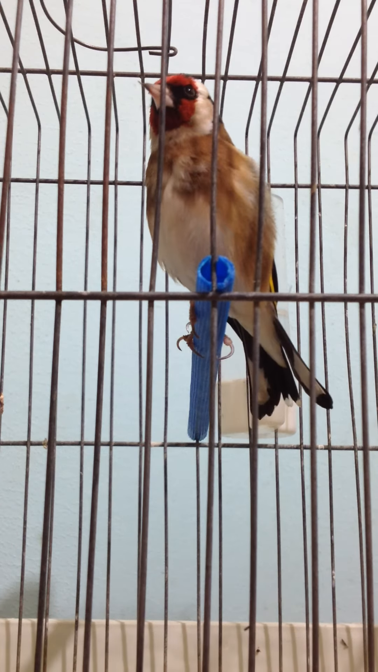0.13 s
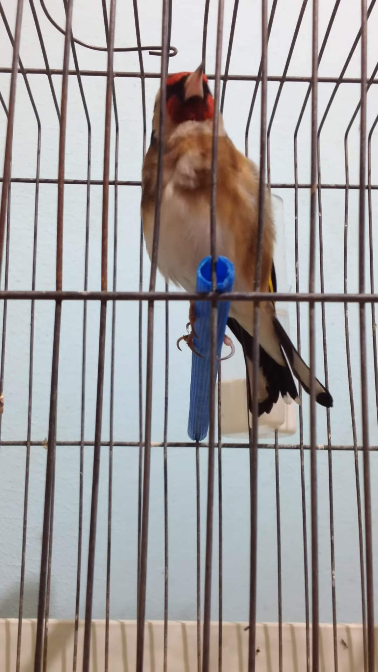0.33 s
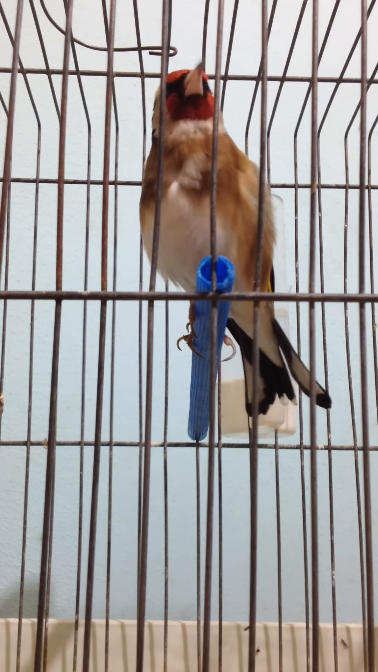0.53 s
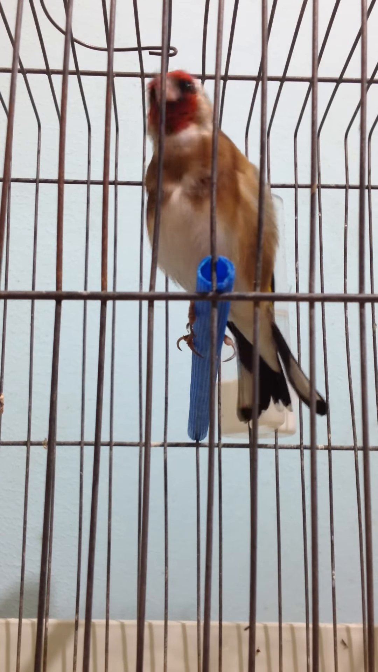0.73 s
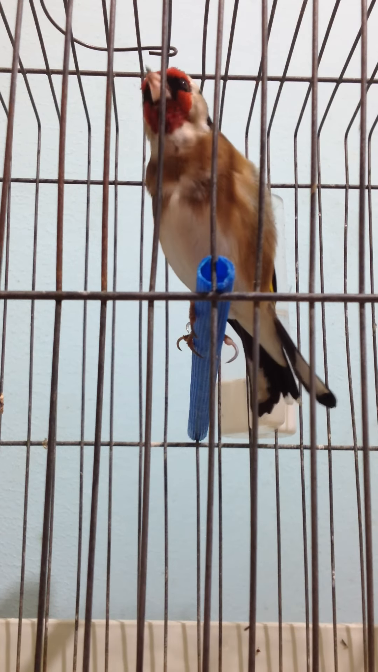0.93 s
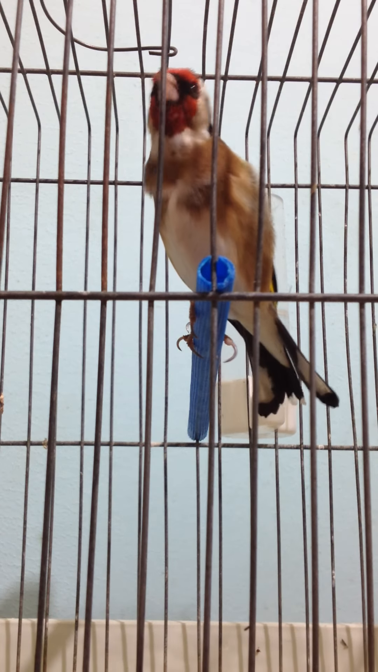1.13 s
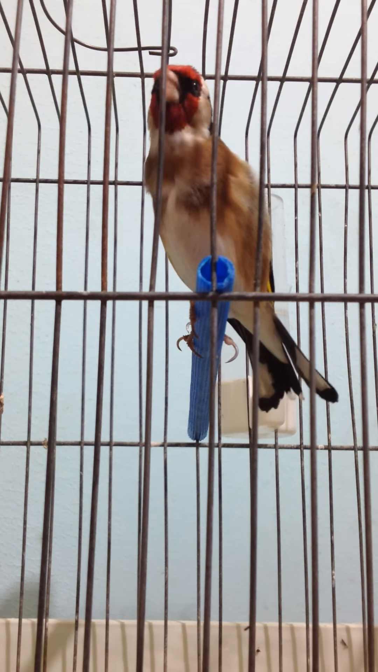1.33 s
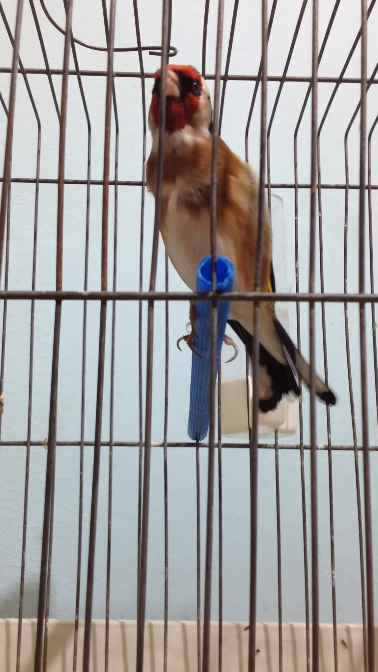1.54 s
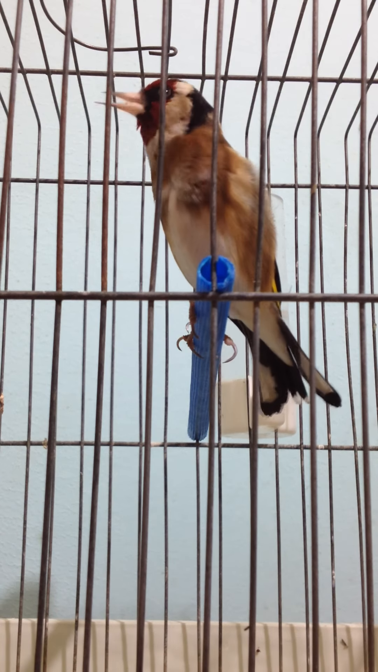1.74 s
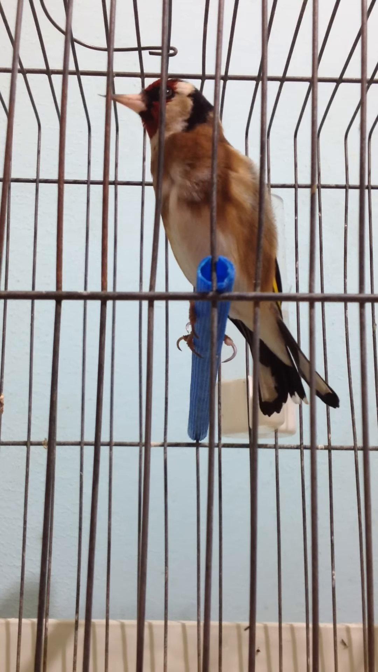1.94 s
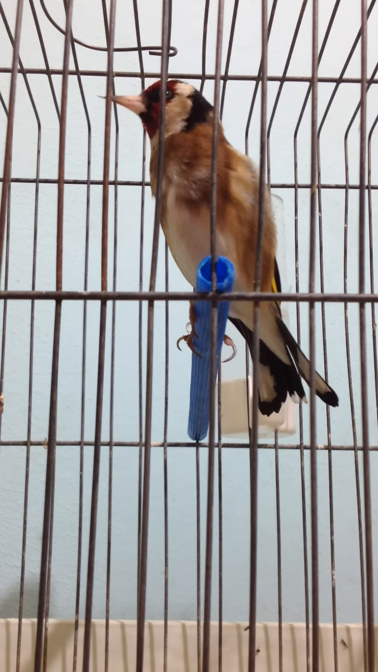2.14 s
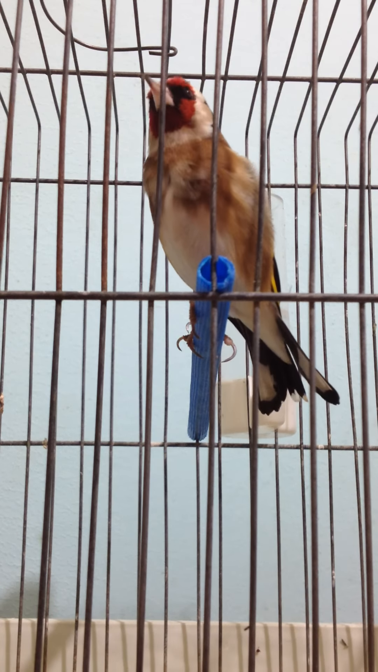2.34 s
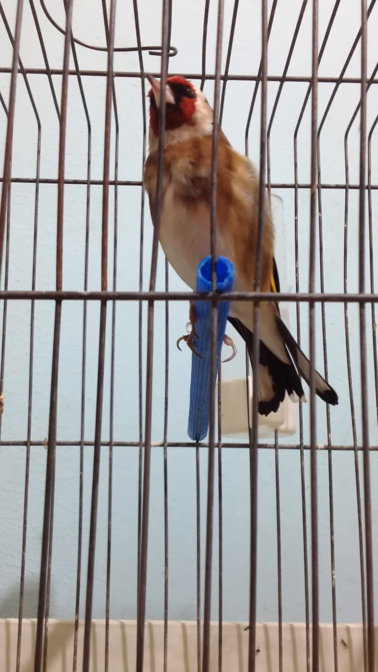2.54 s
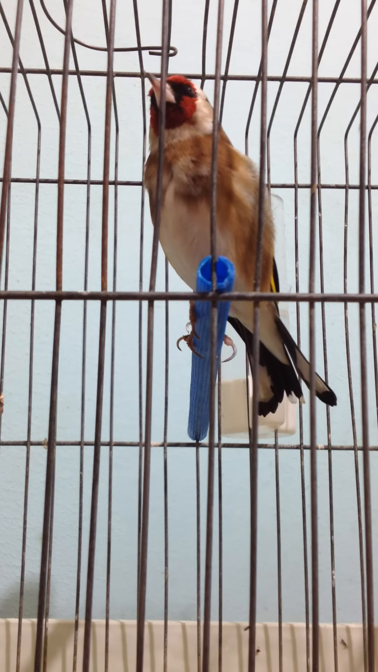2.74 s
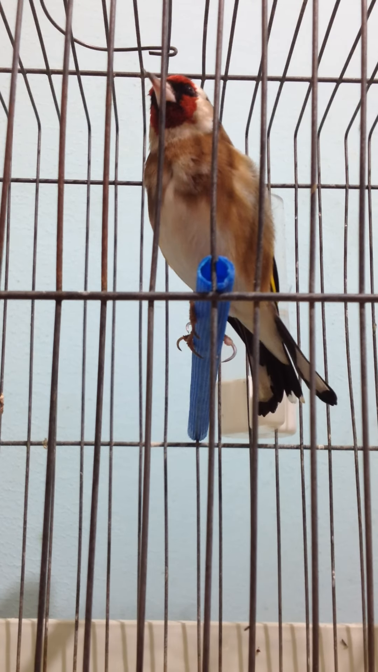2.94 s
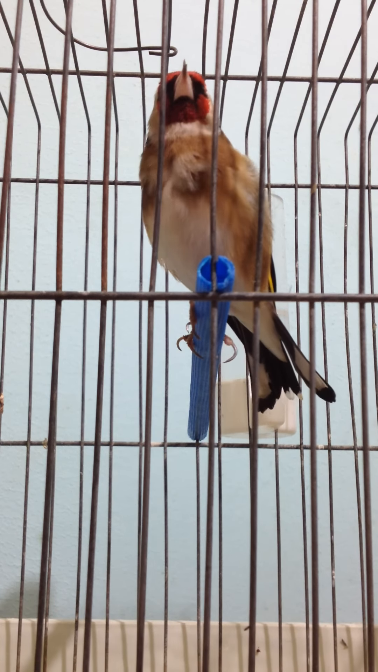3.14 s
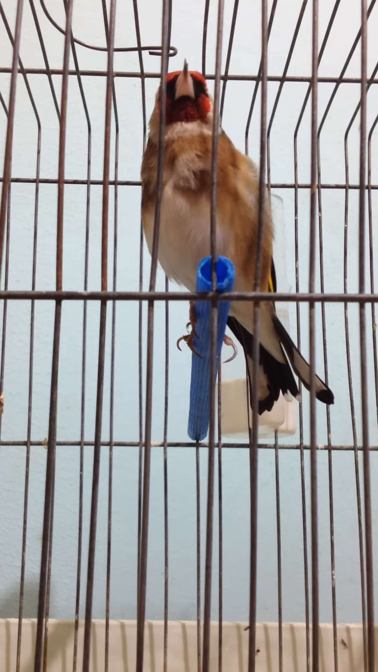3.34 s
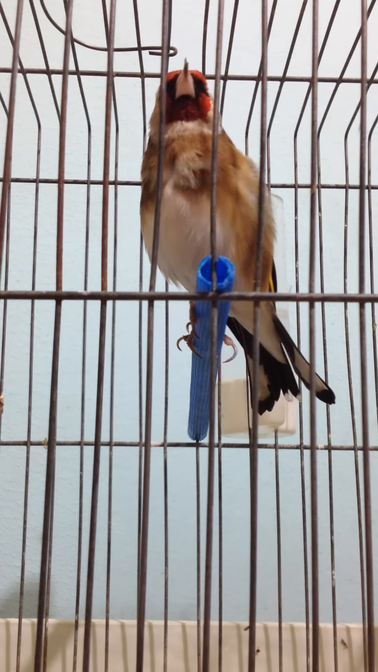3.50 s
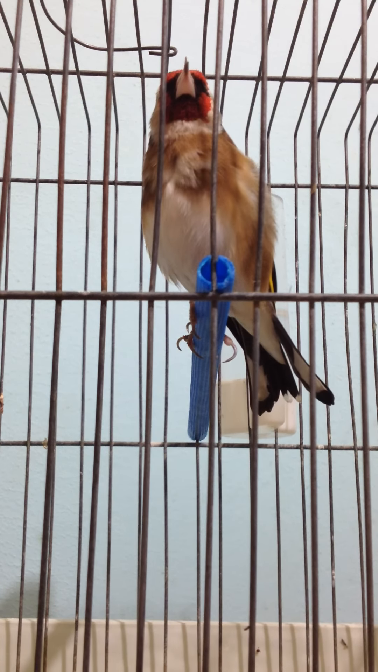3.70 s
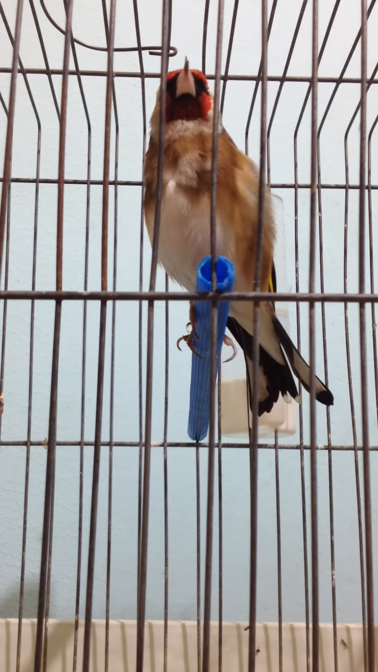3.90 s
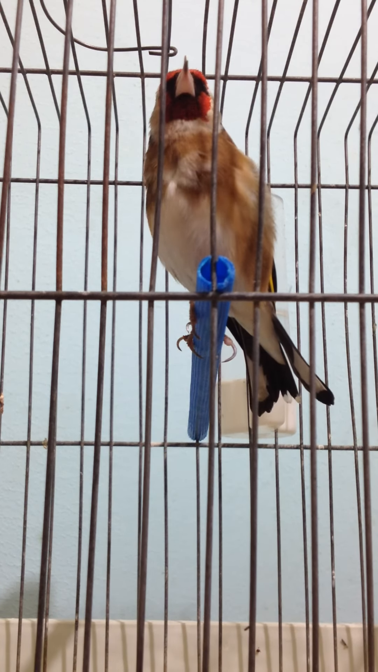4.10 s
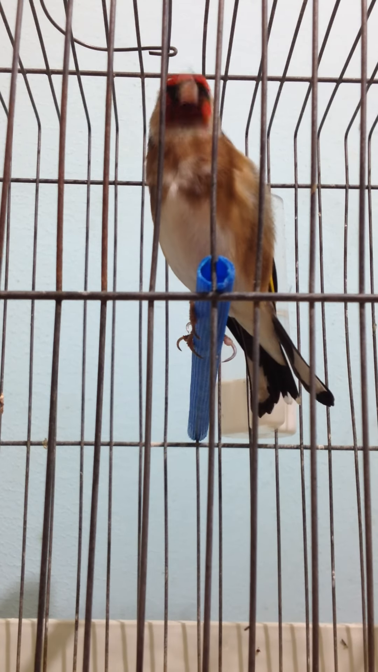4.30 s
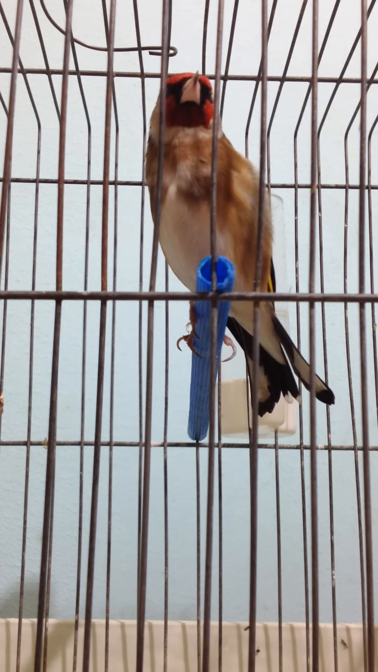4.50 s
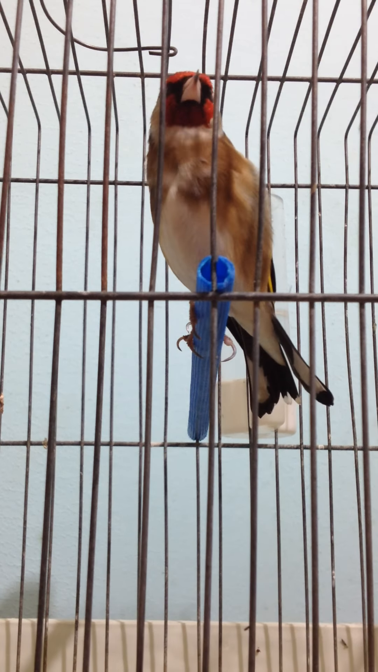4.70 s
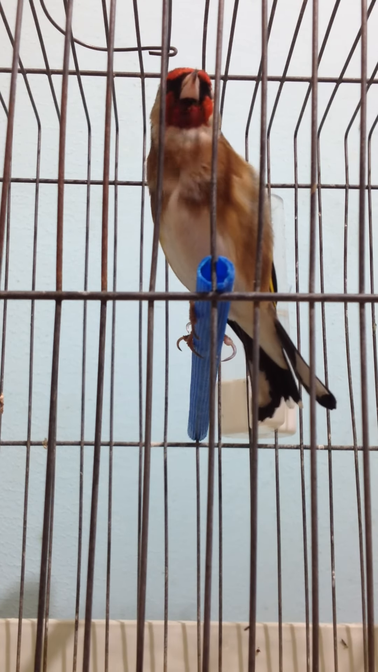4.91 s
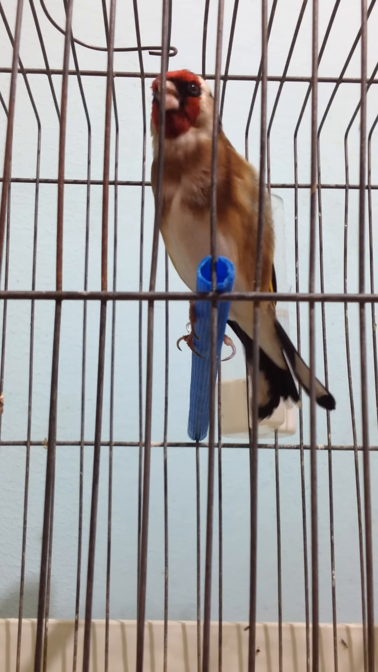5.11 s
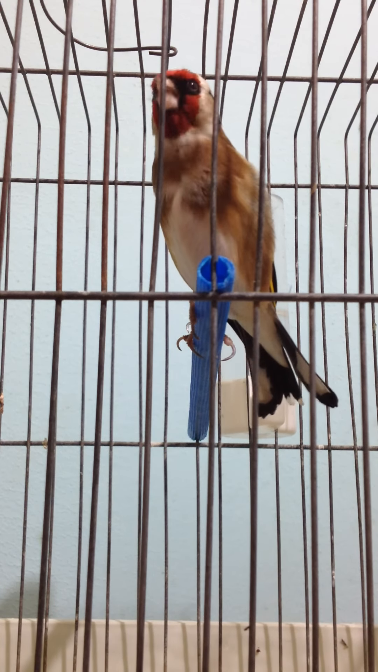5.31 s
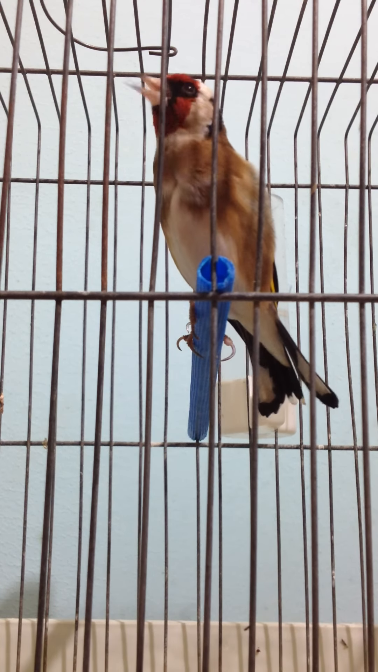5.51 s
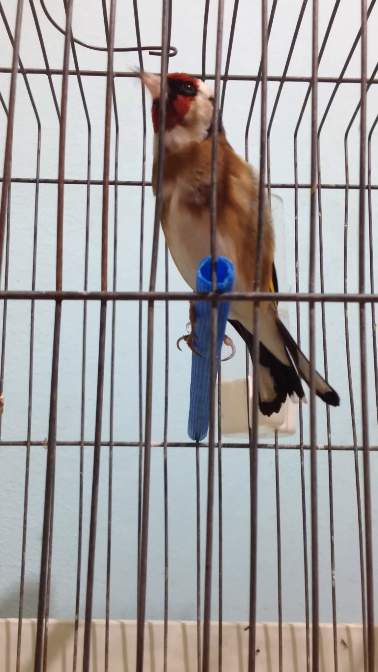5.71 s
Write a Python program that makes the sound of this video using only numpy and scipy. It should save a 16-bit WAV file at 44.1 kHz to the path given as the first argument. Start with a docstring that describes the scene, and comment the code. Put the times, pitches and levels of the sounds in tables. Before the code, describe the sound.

Close chirps and a fast falling trill from a small songbird indoors, then a quiet pause and a second burst of chirps.

```python
"""Caged goldfinch, close up

A goldfinch sings two phrases in a wire cage, close to the microphone in a small room. The two sides
of its syrinx whistle separately or together: chirps, chords and a trill of seven falling sweeps.
Around the first phrase and in the pause, other birds twitter far off, claws tap on the perch
and something bumps softly elsewhere in the house."""
import sys
import numpy as np
from scipy import signal
from scipy.fft import rfft, irfft, next_fast_len
from scipy.io import wavfile
from scipy.ndimage import uniform_filter1d

SR = 44100
rng = np.random.default_rng(int(sys.argv[2]) if len(sys.argv) > 2 else 0)


def transcribe(u):
    """Save the signal u as a 16-bit wav file named by the first command-line argument.

    u: samples, shape (n,) or (channels, n), limited to [-1, 1]; the rate is SR.
    q: integer samples, one column per channel.
    """
    v = np.clip(np.atleast_2d(u).T, -1, 1)
    q = np.round(v * 32767).astype(np.int16)
    wavfile.write(sys.argv[1], SR, q)


N = 253575

# spectrum of the quiet room: (frequency [Hz], relative level [dB])
ROOM_TONE = [(18, -58.5), (30, -30.5), (69, -29), (187, -2.5), (225, -10), (307, -6), (532, -11.5),
             (606, -6.5), (691, -18.5), (767, -16), (1910, -20.5), (4310, -23), (5890, -17), (9190, -33),
             (12000, -29.5), (15500, -27)]
# soft bumps elsewhere in the house: (time [s], level [dB], fade [s])
BUMPS = [(0, -64, 0.07), (.25, -70, 1.1), (2.27, -64.5, 0.07), (2.39, -64, .16), (2.60, -69.5, .1),
         (3.09, -62.5, 0.06), (3.21, -67, .12), (3.30, -66.5, 0.24), (4.00, -71, .12), (4.125, -56, 0.16)]
# resonances the bumps ring with: (centre [Hz], half-width [Hz], relative level [dB])
BUMP_MODES = [(335, 63, -8), (498.4, 60, -1.5), (592.5, 30, -0.5), (664, 40, -1.5), (914.8, 60, -9.5),
              (1210, 50, -16), (1319.7, 19, -15), (1823, 140, -17.5), (2490, 500, -27)]
# reverberation, before stretching: (frequency [Hz], time to fall 60 dB [s])
BASE_T60 = [(500, 0.18), (2500, .3), (3600, 0.34), (4800, 0.25), (6500, .27), (10000, 0.22), (15000, 0.2)]
# bursts of distant twittering: (time [s], relative level [dB], fade [s])
TWITTER_BURSTS = [(.11, -70, .03), (.31, -65, .2), (1.98, -70, .25), (2.23, -71, .12), (2.42, -75, .1),
                  (2.78, -72, .035), (3.03, -71, .15), (3.26, -62, .11), (3.52, -62.5, .11),
                  (3.75, -63, .25), (4.06, -62, .12), (4.24, -61, .13), (4.42, -71, .2), (4.63, -65, .09)]
# spectrum of the twittering: (frequency [Hz], gain [dB])
TWITTER_COLOUR = [(2500, -16), (3400, -7), (4400, 1.5), (5300, -10), (6000, -2.5), (6900, -4.5),
                  (7700, -24)]
# whistles of a far bird: (time [s], length [s], from [Hz], to [Hz], bend, relative level [dB],
# attack [s], release [s]); a bend near 0 glides evenly, a higher one settles sooner
FAR_NOTES = [ (.122, .06, 4800, 4710, 5, -54, .012, .045), (.122, .055, 6300, 6030, 8, -57, .012, .045),
             (2.16, .16, 5700, 2955, .8, -72, .04, .04), (3.81, .18, 6015, 6690, 4.5, -53.5, .05, .015),
             (3.98, .06, 6600, 5850, 6, -56, .005, .045), (4.29, .21, 5970, 6550, 7, -53, .055, .09),
             (4.49, .04, 6400, 5850, 2, -62, .005, .01), (4.33, .16, 4240, 3860, 1, -66, .03, .03), ]
# how well each pitch carries from beak to microphone: (frequency [Hz], gain [dB])
CARRY = [(1200, -7), (1900, -2), (2700, .3), (3300, -.8), (3640, -6.3), (3950, 1.4), (4250, -.3),
         (4550, .3), (4900, 2.6), (5250, -10), (5600, -6), (6150, .8), (6500, -2.3), (7100, -4.5)]
# the beak beams the highest tones off microphone, into the tail: (frequency [Hz], gain [dB])
TAIL_COLOUR = [(2700, -1), (3600, 0.5), (4800, -1.5), (6300, -1.5), (9000, 3), (14000, 3)]
# reflections from the nearest surfaces: (delay [s], gain)
REFLECTIONS = [(.0021, 0.079), (.0046, -.1), (.0078, .12), (0.0118, .09), (.0225, .1), (.033, 0.049)]
# claws on the perch: (time [s], level [dB], fade [s], woody share [0-1])
CLAW_TAPS = [(.268, -68, 0.029, 0.76), (2.622, -65, .014, .9), (2.647, -56, .0015, .2),
             (3.322, -61.5, 0.0064, .8), (3.70, -71, .012, 0.62), (4.215, -62, 0.0019, .2),
             (4.531, -55.5, 0.00097, .1)]
# ring of the perch: (centre [Hz], half-width [Hz], relative level [dB])
PERCH_MODES = [(1800, 400, -3), (2400, 500, 0.5), (3200, 700, -4)]
# notes of the high and low sides of the finch's syrinx: (columns of FAR_NOTES, overtones [dB])
HIGH_NOTES = [(0.529, 0.03, 3400, 6270, 12, -9, 0.017, 0.013, -16),
              (0.6389, 0.022, 3640.0, 4300.0, -0.9, -23.4, 0.003, 0.015, -19.0),
              (1.659, 0.028, 8170.0, 5148.0, -1.7, -23.2, 0.021, 0.002, -15),
              (1.7717, 0.035, 2370.0, 3600.0, -1.0, -24.5, 0.031, 0.002, -28.0),
              (1.791, 0.058, 3110.0, 4072.0, 13.0, -30.5, 0.014, 0.002, -30.0),
              (4.8227, 0.023, 3840.0, 4076.0, -3.3, -23.6, 0.002, 0.021, -19.0),
              (4.876, 0.031, 2100.0, 3046.0, 0.3, -34.7, 0.012, 0.01, -24.0),
              (5.056, 0.035, 8100, 6253, 5.8, -7.5, 0.018, 0.009, -16),
              (5.1475, 0.051, 6500, 5594.0, 16, -8.5, 0.03, 0.005, -14.0),
              (5.251, 0.012, 1700, 3750, 0.6, -22, 0.007, 0.004, -21),
              (5.2856, 0.046, 5150.0, 4442.0, 2.2, -14.8, 0.029, 0.002, -16.0),
              (5.3794, 0.042, 6820.0, 5359.0, 4.3, -10.4, 0.01, 0.014, -11.0),
              (5.5069, 0.042, 6810.0, 4556.0, 3.1, -6.9, 0.017, 0.01, -21.0),
              (5.5864, 0.019, 7360.0, 5200.0, 3.4, -10.5, 0.003, 0.016, -12.0),
              (5.625, 0.015, 4150, 4110, 2, -6.5, 0.004, 0.011, -30),
              (5.7154, 0.011, 7690.0, 5402.0, 1.1, -9.5, 0.003, 0.002, -14.0)]
LOW_NOTES = [(0.5339, 0.021, 5810.0, 5069.0, 7.3, -15.4, 0.004, 0.009, -13.0),
             (0.6277, 0.031, 2610.0, 4044.0, 0.7, -18.0, 0.011, 0.003, -20.0),
             (0.6771, 0.032, 1890.0, 2189.0, 3.8, -33.0, 0.015, 0.015, -15.0),
             (1.4988, 0.059, 1300.0, 2339.0, 2.3, -32.8, 0.042, 0.012, -19.0),
             (1.5733, 0.049, 3040.0, 3125.0, 6.4, -16.5, 0.035, 0.004, -24.0),
             (1.665, 0.07, 5770.0, 4422.0, 4.6, -4.8, 0.019, 0.035, -20.0),
             (1.77, 0.034, 1550, 2720, 1, -30, 0.028, 0.006, -15),
             (1.7967, 0.083, 2760.0, 3653.0, 8.6, -18.9, 0.016, 0.017, -15.0),
             (4.8076, 0.03, 2500.0, 3616.0, 3.0, -13.8, 0.019, 0.013, -21.0),
             (4.8774, 0.053, 1230.0, 2586.0, 3.2, -23.3, 0.048, 0.013, -29.0),
             (4.9816, 0.047, 2780.0, 3559.0, 1.0, -17.3, 0.042, 0.002, -13.0),
             (5.0581, 0.032, 6240.0, 5038.0, 7.7, -8.5, 0.015, 0.007, -21.0),
             (5.1512, 0.048, 4940.0, 4180.0, 9.3, -13.5, 0.018, 0.024, -16.0),
             (5.2425, 0.014, 1150, 4200, -0.4, -26, 0.01, 0.003, -18),
             (5.296, 0.035, 4770.0, 4307.0, 6.8, -7.3, 0.012, 0.009, -20.0),
             (5.3533, 0.028, 2740.0, 3480.0, 1.3, -24.8, 0.009, 0.002, -20.0),
             (5.4803, 0.032, 2440.0, 3534.0, 0.8, -20.3, 0.022, 0.006, -21.0),
             (5.5925, 0.031, 6180.0, 4266.0, 2.1, -10.3, 0.022, 0.005, -22.0),
             (5.6236, 0.007, 2840.0, 4045.0, 1.6, -14.7, 0.003, 0.002, -23.0),
             (5.6309, 0.044, 4640.0, 2251.0, 4.3, -20.7, 0.002, 0.032, -22.0),
             (5.718, 0.04, 5900, 4100, 1.3, -8.3, 0.024, 0.002, -21)]
# how throat and open beak pass overtones and combination tones: (frequency [Hz], gain [dB])
BEAK = [(100, -36), (1200, -30), (2600, -13.5), (3800, 7.5), (6900, -3.5), (7600, -11), (8400, -20.5),
        (11000, -18), (14000, -18.5), (15500, -25)]
# turbulence of the airstream in fast glides: (frequency [Hz], gain [dB])
RASP_COLOUR = [(40, -12), (200, -10), (600, -13), (1200, -9.5), (3000, -2), (6000, 3), (8500, 0),
               (11000, -2), (14500, 0), (15500, -3)]
# the membranes flutter into a buzz: (start [s], end [s], swing [share of pitch], rate [Hz])
FLUTTERS = [(0.64, 0.66, 0.037, 213), (1.807, 1.856, 0.036, 154), (4.823, 4.845, 0.042, 262),
            (5.252, 5.266, 0.04, 333), (5.626, 5.637, 0.023, 170)]
# one trill syllable on each side, timed from its start: (columns of HIGH_NOTES)
SWEEP_HIGH = (-.002, .027, 8300, 4590, 3.05, -5.4, .009, .007, -15.5)
SWEEP_LOW = (.0005, .075, 5090, 2600, 3.1, -14.6, .009, .007, -19.5)
# syllables of the trill: (time [s], effort [dB], pitch factor, length factor)
SYLLABLES = [(0.7524, 0.1, 1.029, 0.98), (0.8558, -1.2, 1.016, 0.99), (0.961, -0.4, 1.031, 1.02),
             (1.0672, -1.4, 1.018, 1.03), (1.1725, -1.0, 1.018, 0.99), (1.281, -1.7, 1.011, 0.97),
             (1.3928, -2.3, 1.008, 0.97)]


def amp(db):
    """Decibels to gain."""
    return 10 ** (np.asarray(db) / 20)


def unit(x):
    """Scales to rms 1."""
    return x / np.sqrt(np.mean(x ** 2) + 1e-20)


def read(points, hz):
    """Reads a table on a log-frequency axis."""
    f, value = np.transpose(points)
    return np.interp(np.log(hz + 1), np.log(f + 1), value)


def colour(x, points):
    """Filters by a spectrum in dB."""
    size = next_fast_len(len(x) + 4096)
    gain = amp(read(points, np.fft.rfftfreq(size, 1 / SR)))
    return irfft(rfft(x, size) * gain, size)[:len(x)]


def add(mix, s, sound):
    """Mixes a sound in at time s."""
    part = mix[max(round(s * SR), 0):][:len(sound)]
    part += sound[:len(part)]


def wander(length, size):
    """Smooth chance of rms 1 that changes over about size samples."""
    return unit(uniform_filter1d(uniform_filter1d(rng.standard_normal(length), size), size))


def swells(rows, rise_s):
    """Level over time of sounds that each rise quickly and fade away."""
    t, level = np.arange(2 * SR) / SR, np.zeros(N)
    for s, db, fade in rows:
        add(level, s, amp(db) * np.minimum(t / rise_s, 1) * np.exp(-t / fade))
    return level


def resonant_noise(modes):
    """Noise of rms 1 ringing in a set of resonances."""
    hz = np.fft.rfftfreq(N, 1 / SR)
    gain = sum(amp(db) / (1 + ((hz - centre) / width) ** 2) for centre, width, db in modes)
    return unit(irfft(rfft(rng.standard_normal(N)) * gain, N))


def room_tone(db=-70.5):
    """The steady quiet of the room at the microphone."""
    return amp(db) * unit(colour(rng.standard_normal(N), ROOM_TONE))


def house_bumps():
    """Dull bumps, blurred by the rooms between them and the microphone."""
    return swells(BUMPS, rise_s=0.018) * resonant_noise(BUMP_MODES)


def reverberate(x, stretch=0.92, onset_s=0.0019):
    """Diffuse tail of energy 1: sparse taps, each band dying at its own speed."""
    taps = rng.choice([-1., 1.], SR) * (rng.random(SR) < 1 / 10)
    hz, t, bands = signal.stft(taps, SR, nperseg=256)
    t60 = stretch * read(BASE_T60, hz)[:, None]
    tail = signal.istft(bands * np.exp(-np.log(1000) * t / t60), SR, nperseg=256)[1]
    tail *= np.clip(np.arange(len(tail)) / (SR * onset_s) - 1, 0, 1)
    return signal.fftconvolve(x, tail / np.linalg.norm(tail))[:N]


def far_twitter(gain_db=2, count=700):
    """Birds far off: quick falling chirps that reach the microphone as a reverberant blur."""
    t, chirps = np.arange(700) / SR, np.zeros(N)
    for k, (late, begin, end) in enumerate(rng.random((count, 3))):
        sweep = signal.chirp(t, 4500 + 3500 * begin, t[-1], 2300 + 2700 * end)
        add(chirps, (k + late) * N / SR / count, sweep * signal.windows.tukey(len(t)))
    blur = colour(reverberate(chirps, stretch=2.4), TWITTER_COLOUR)
    blur /= np.sqrt(abs(uniform_filter1d(blur ** 2, size=4000)) + 1e-6)  # even out the level
    return amp(gain_db) * swells(TWITTER_BURSTS, rise_s=.04) * blur


def whistle(start, length, from_hz, to_hz, bend, db, attack, release,
            sag_db_per_s=0, jitter=0.0028, shimmer=0.05, waver_db=.9, ends_db=-23, ease=1.8):
    """A membrane glides to a new tension as the breath swells and stops: level, phase, glide speed."""
    t = np.arange(max(int(length * SR), 200)) / SR
    gesture = from_hz + (to_hz - from_hz) * np.expm1(-bend * t / t[-1]) / np.expm1(-bend)
    pitch = gesture * flutter(start + t) * (1 + jitter * wander(len(t), size=30))
    opening = np.maximum(1 - t / attack, 0)
    closing = np.maximum(1 - (t[-1] - t) / release, 0)
    breath_db = db + sag_db_per_s * t + ends_db * (opening ** ease + closing ** ease)
    level = amp(breath_db + read(CARRY, gesture) + waver_db * wander(len(t), size=200))
    level *= 1 + shimmer * wander(len(t), size=40)
    level *= signal.windows.tukey(len(t), 120 / len(t))
    octaves_per_s = abs(np.gradient(np.log2(gesture))) * SR
    return level, 2 * np.pi * np.cumsum(pitch) / SR, octaves_per_s


def room(x, wet_db):
    """Direct sound at the microphone, reflections from the nearest surfaces, and the tail."""
    out = x + amp(wet_db) * reverberate(colour(x, TAIL_COLOUR))
    for delay, gain in REFLECTIONS:
        add(out, delay, gain * x)
    return out


def far_whistles(gain_db=-6):
    """A distant bird's pure whistles, more reverberation than direct sound."""
    whistles = np.zeros(N)
    for start, *shape in FAR_NOTES:
        level, phase, _ = whistle(start, *shape, jitter=.005)
        add(whistles, start, level * np.sin(phase))
    return amp(gain_db) * room(whistles, wet_db=5)


def claws():
    """Each tap in the cage is a bright tick and a short ring of the perch."""
    t = np.arange(SR) / SR
    tick, ring = np.zeros(N), np.zeros(N)
    for s, db, fade, woody in CLAW_TAPS:
        tap = amp(db) * np.exp(-t / fade)
        add(tick, s, (1 - woody) * tap)
        add(ring, s, woody * tap)
    return tick * rng.standard_normal(N) + ring * resonant_noise(PERCH_MODES)


def syrinx_side(notes, smear, sag_db_per_s, third_db=-2.5, fourth_db=-13, fast_octaves_per_s=35):
    """One side's notes: the complex fundamental, its overtones, and how strongly it stirs the air."""
    tone, overtones, stir = np.zeros(N, complex), np.zeros(N), np.zeros(N)
    for start, *shape, bright_db in notes:
        level, phase, glide = whistle(start, *shape, sag_db_per_s)
        unsteady = np.tanh(glide / fast_octaves_per_s)  # fast glides upset the shape of each cycle
        add(tone, start, level * np.exp(1j * phase))
        add(stir, start, level * unsteady)
        ragged_phase = phase + smear * unsteady * wander(len(phase), size=14)
        for k, db in enumerate([0, third_db, fourth_db], 2):
            in_band = k * np.gradient(phase) < np.pi
            add(overtones, start, amp(bright_db + db) * level * in_band * np.sin(k * ragged_phase))
    return tone, overtones, stir


def syrinx(high_notes, low_notes, smear, sum_db, rasp_db, sideband_db=-17, sag_db_per_s=0):
    """Both sides share one airstream, so sounding together they make combination tones."""
    high, high_overtones, high_stir = syrinx_side(high_notes, smear, sag_db_per_s)
    low, low_overtones, low_stir = syrinx_side(low_notes, smear, sag_db_per_s)
    flow = abs(high) + abs(low) + 1e-6
    sum_and_difference = 2 * high.real * low.real / flow
    sidebands = (high ** 2 * low.conj() + 4 * low ** 2 * high.real).real / flow ** 2
    combinations = amp(sum_db) * sum_and_difference + amp(sideband_db) * sidebands
    partials = colour(high_overtones + low_overtones + combinations, BEAK)
    rasp = colour((high_stir + low_stir) * rng.standard_normal(N), RASP_COLOUR)
    return (high + low).real + partials + amp(rasp_db) * rasp


def finch_notes():
    """The close finch's chirps and chords, nearly pure."""
    return syrinx(HIGH_NOTES, LOW_NOTES, smear=0.3, sum_db=-11.5, rasp_db=-47)


def flutter(t):
    """Factor on the pitch: a quick swing while the membranes buzz."""
    return 1 + sum(swing * np.sin(2 * np.pi * rate * (t - start)) * (t > start) * (t < end)
                   for start, end, swing, rate in FLUTTERS)


def repeat_sweep(delay, length, from_hz, to_hz, bend, db, *rest):
    """The same falling gesture, about nine times a second."""
    return [(s + delay, length * stretch, from_hz * pitch, to_hz * pitch, bend, db + effort_db, *rest)
            for s, effort_db, pitch, stretch in SYLLABLES]


def finch_trill():
    """Forced and raspy; each syllable weakens as it runs out of breath."""
    high, low = repeat_sweep(*SWEEP_HIGH), repeat_sweep(*SWEEP_LOW)
    return syrinx(high, low, smear=.25, sum_db=-8.5, rasp_db=-32.5, sag_db_per_s=-90)


def scene():
    """The cage close to the microphone, with far birds and the house faint behind it."""
    cage = room(finch_notes() + finch_trill(), wet_db=-11) + room(claws(), wet_db=-2)
    return (cage + far_whistles() + far_twitter() + house_bumps() + room_tone())[None]


def record(dry, lopsided_db=-50, edge_hz=15500):
    """One microphone with a slightly lopsided response, then the band limit."""
    distortion = signal.sosfilt(signal.butter(2, 150, "high", fs=SR, output="sos"), dry ** 2)
    lowpass = signal.firwin(511, edge_hz, window=("kaiser", 9), fs=SR)
    return signal.oaconvolve(dry + amp(lopsided_db) * distortion, lowpass[None], "same")


dry = scene()
out = record(dry)
transcribe(out)
```